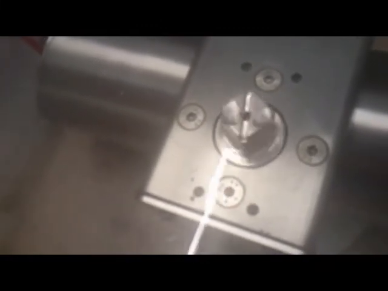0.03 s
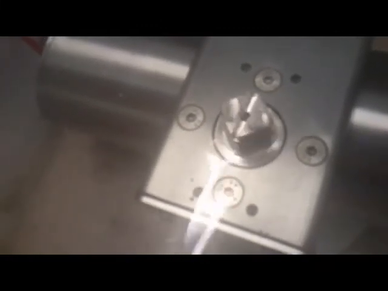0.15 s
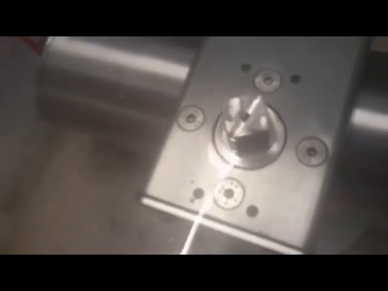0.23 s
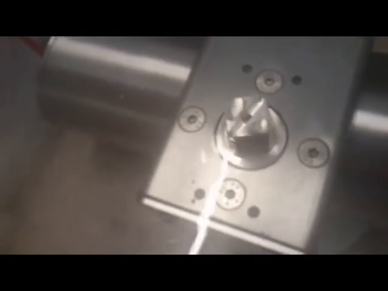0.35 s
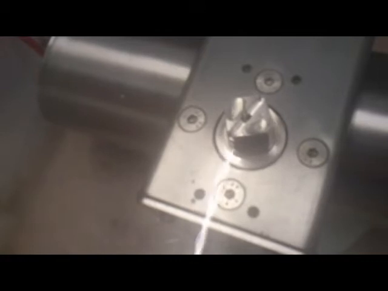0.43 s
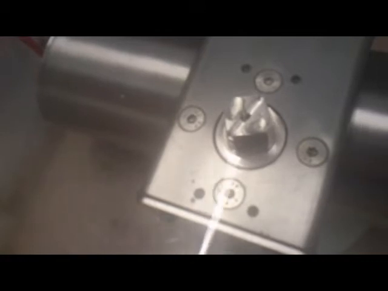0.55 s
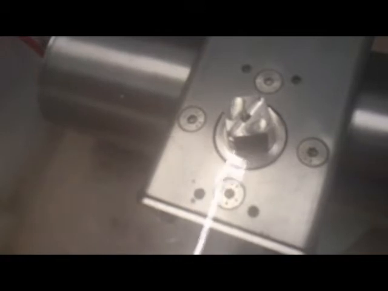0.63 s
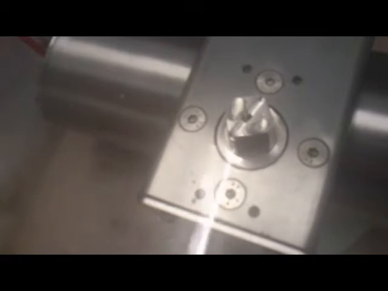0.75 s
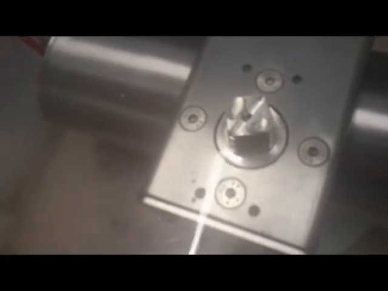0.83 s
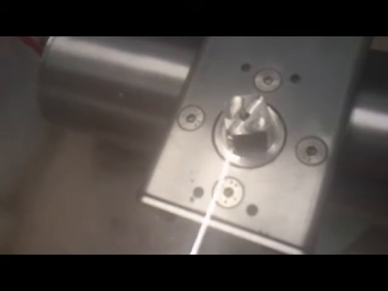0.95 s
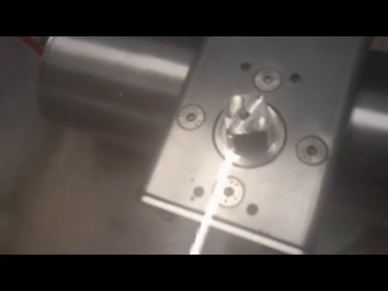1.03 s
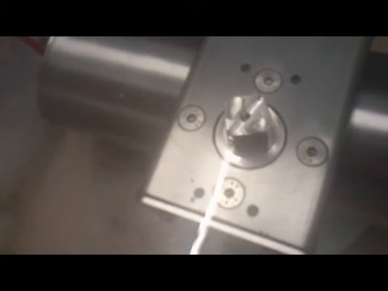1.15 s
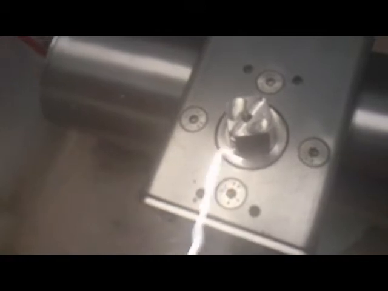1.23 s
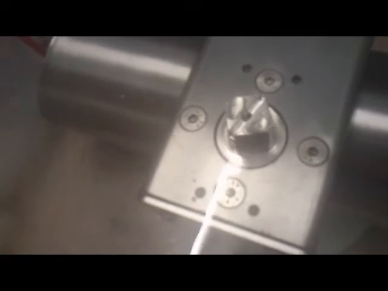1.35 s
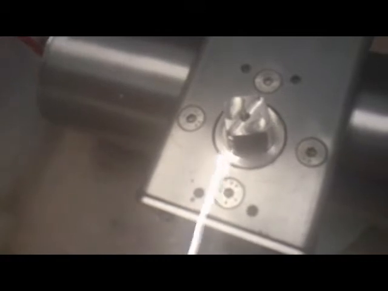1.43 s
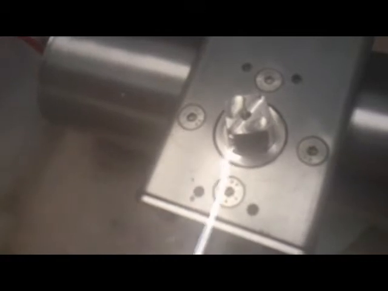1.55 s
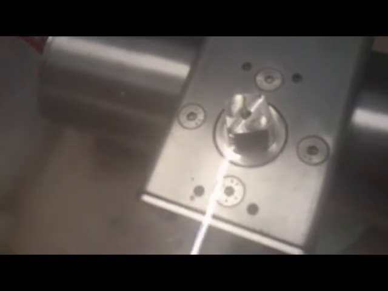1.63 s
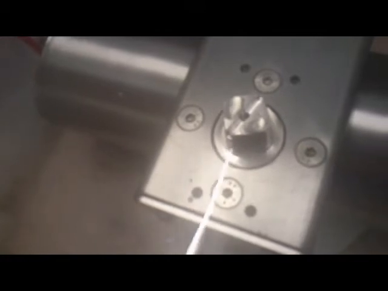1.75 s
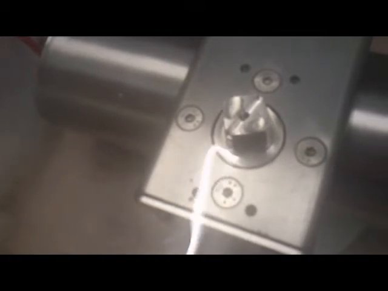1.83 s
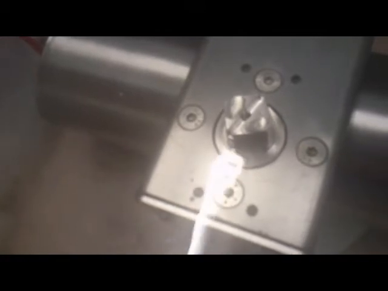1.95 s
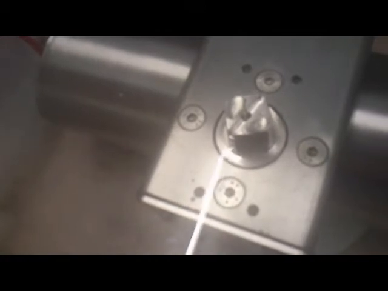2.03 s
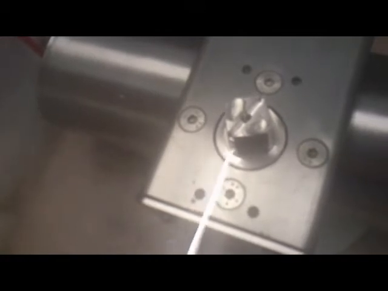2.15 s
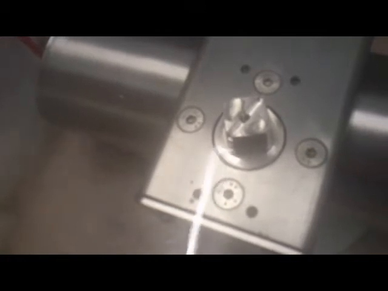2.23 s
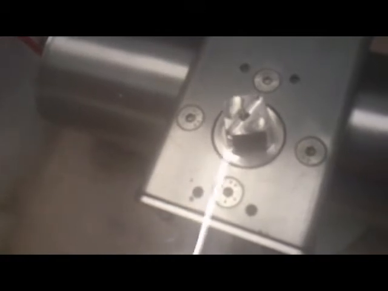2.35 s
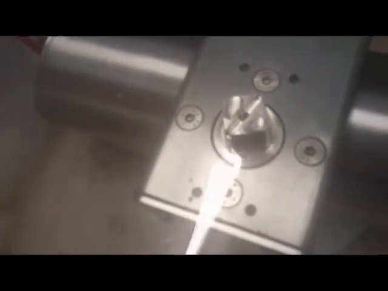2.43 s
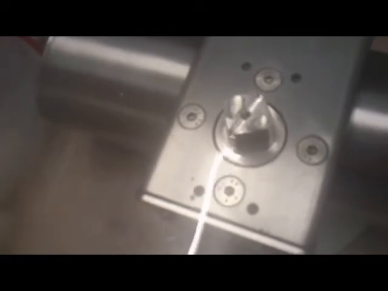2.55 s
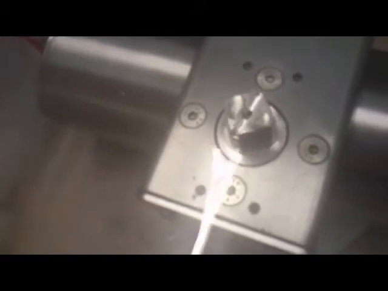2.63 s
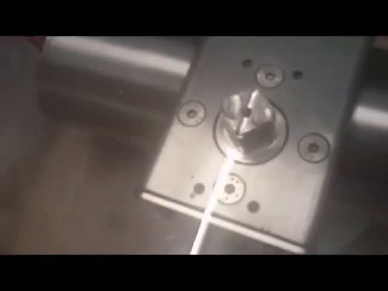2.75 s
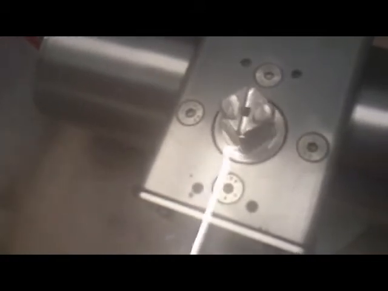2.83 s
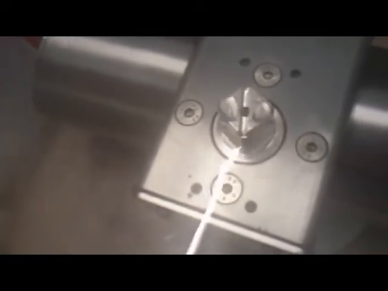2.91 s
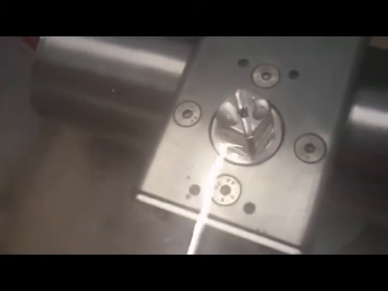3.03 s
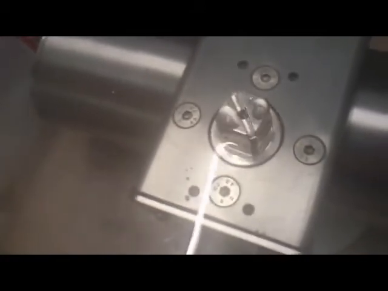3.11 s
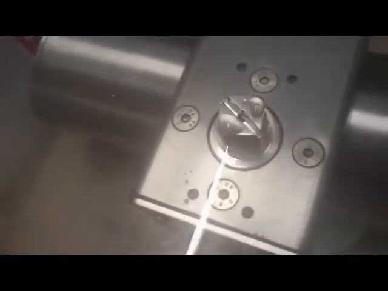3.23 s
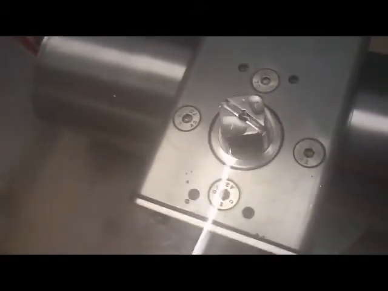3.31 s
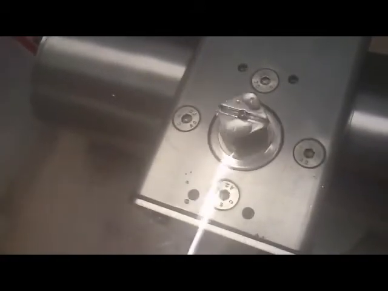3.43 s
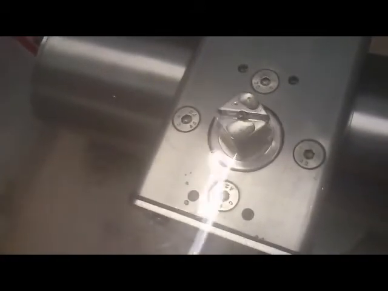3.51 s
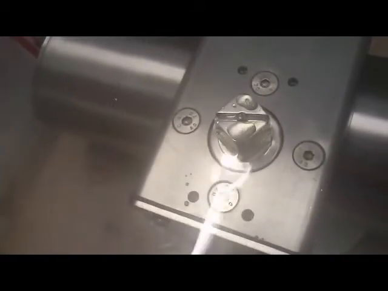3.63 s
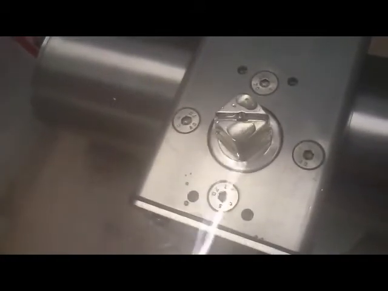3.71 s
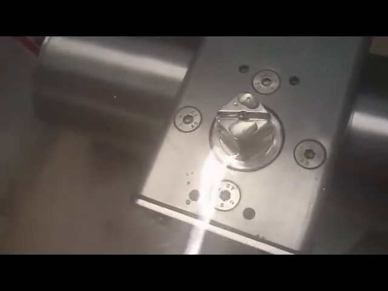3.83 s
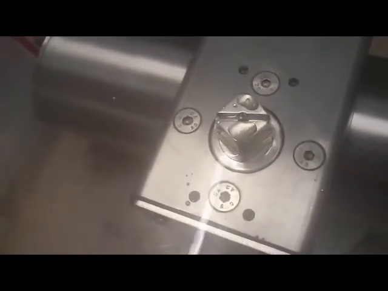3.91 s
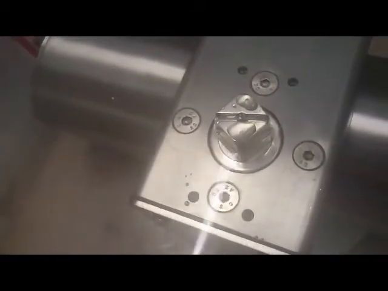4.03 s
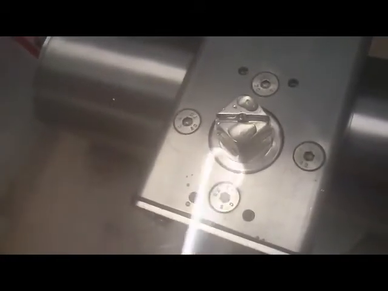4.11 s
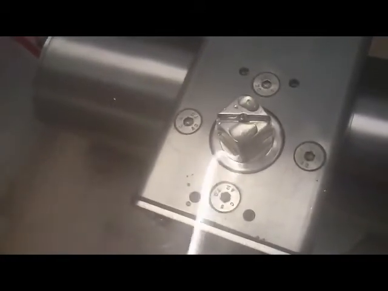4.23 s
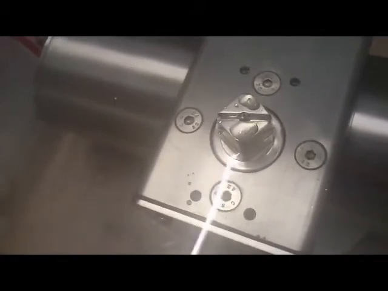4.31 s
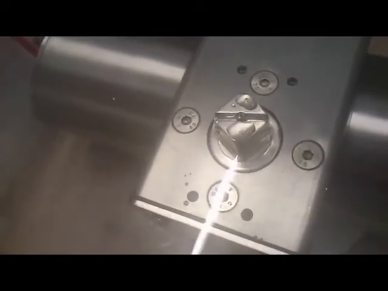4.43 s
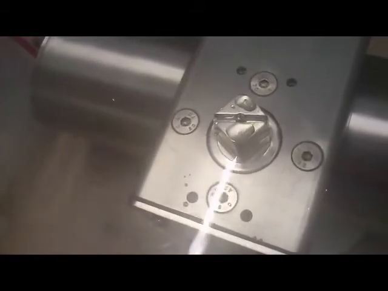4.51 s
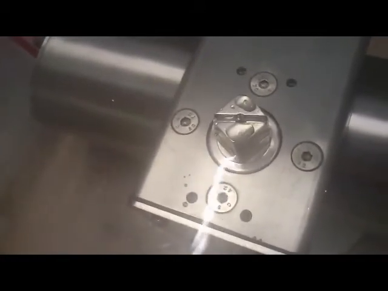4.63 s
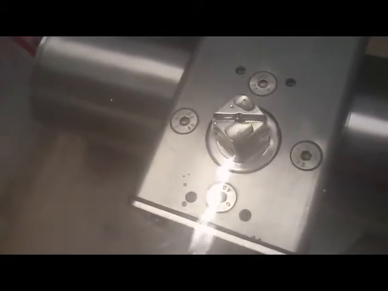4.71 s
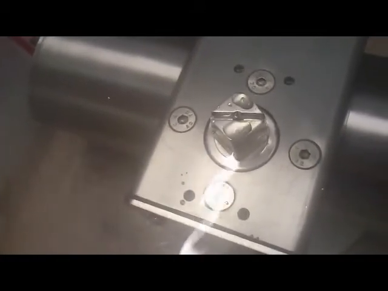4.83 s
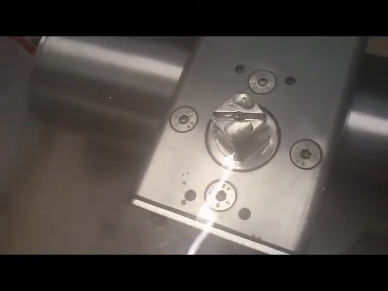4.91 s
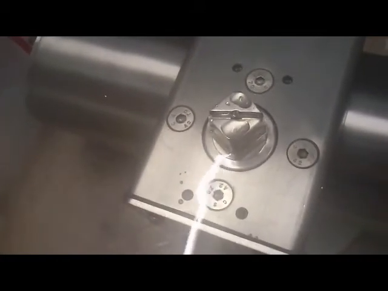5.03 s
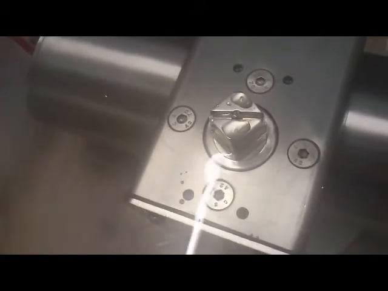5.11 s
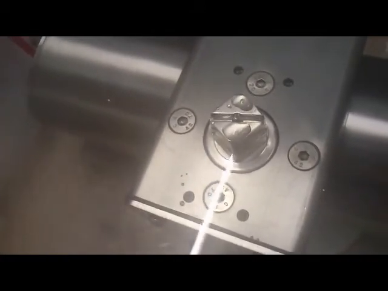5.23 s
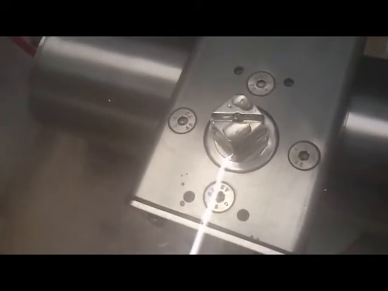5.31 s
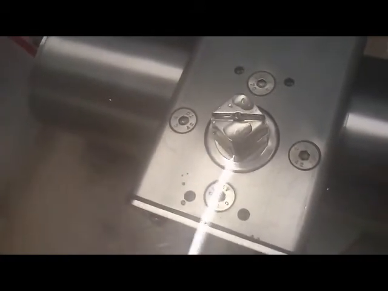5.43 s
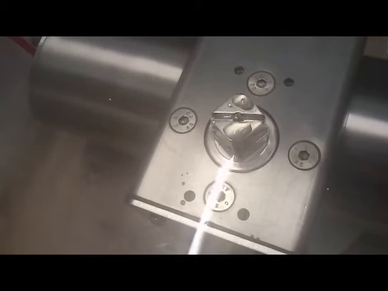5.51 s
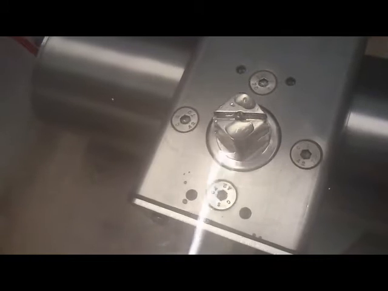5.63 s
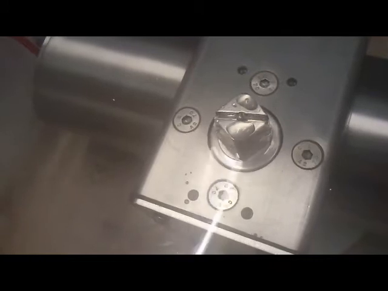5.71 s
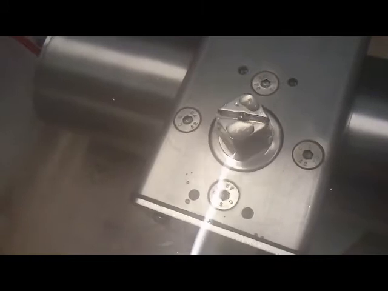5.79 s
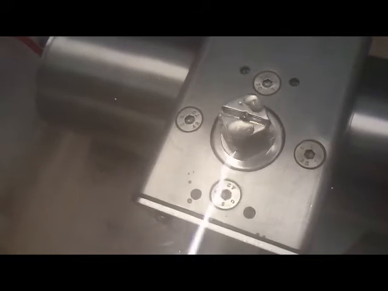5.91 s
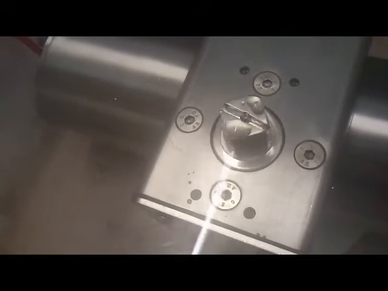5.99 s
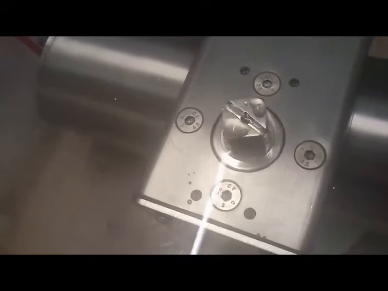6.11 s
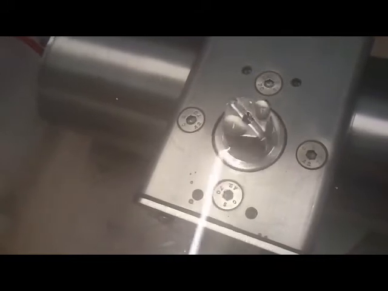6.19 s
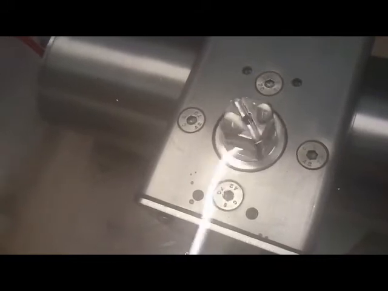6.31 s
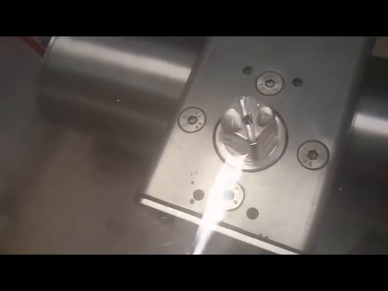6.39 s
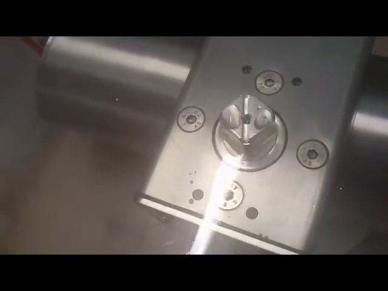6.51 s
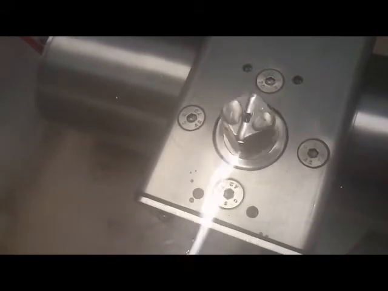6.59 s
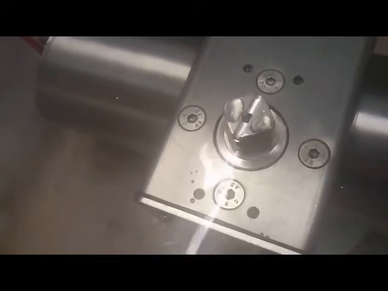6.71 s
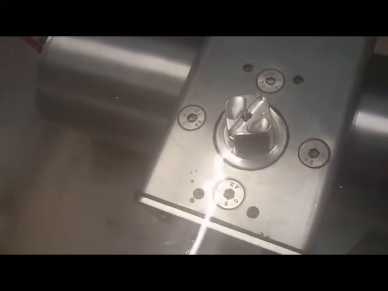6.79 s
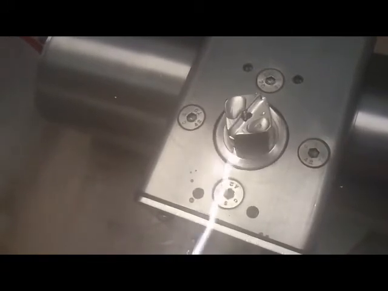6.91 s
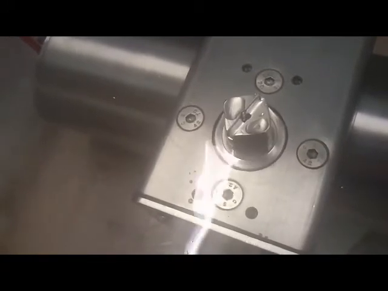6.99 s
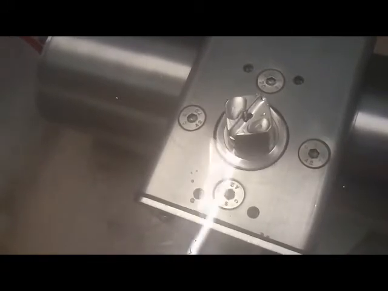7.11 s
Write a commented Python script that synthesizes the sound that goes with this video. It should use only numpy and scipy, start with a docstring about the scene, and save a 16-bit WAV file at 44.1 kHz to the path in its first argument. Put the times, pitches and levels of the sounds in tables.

```python
"""A small workshop: a pneumatic rotary actuator on a steel block is cycled three times, close by.
Jets of filtered noise roar from the exhaust port for about a second each; the first is already under way.
The later blasts come with a thud and a louder start. After closings the line bleeds down as hiss and a thin
whistle, the third cut short by the end. Forced bench modes knock softly over faint air noise and machine hum."""
import sys
import numpy as np
from scipy import signal
from scipy.fft import rfft, irfft
from scipy.io import wavfile

SR = 44100
rng = np.random.default_rng(int(sys.argv[2]) if len(sys.argv) > 2 else 0)


def master(y):
    """Save y as 16-bit WAV."""
    cut = np.clip(np.atleast_2d(y).T, -1, 1)
    pcm = np.round(cut * 32767)  # scale
    wavfile.write(sys.argv[1], SR, pcm.astype(np.int16))


N = 315315
TIME = np.arange(N) / SR
FREQ = np.maximum(np.fft.rfftfreq(N, 1 / SR), 1)


def from_db(db):
    """Decibels to gain."""
    return 10 ** (np.asarray(db) / 20)


def since(start_s):
    """Seconds gone by since a moment, zero before it."""
    return np.maximum(TIME - start_s, 0)


def at_level(x):
    """Scale stereo sound so that its left-right mean has rms 1."""
    return x / np.sqrt(np.mean(x.mean(axis=0) ** 2) + 1e-20)


def panned(x, right_db):
    """Lean a sound to the right by a level difference."""
    return x * from_db(np.array([[-right_db], [right_db]]) / 2)


def over_pitch(rows, hz=FREQ):
    """Interpolate each column of a spectrum on a log-frequency axis."""
    points, *columns = np.transpose(rows)
    return np.array([np.interp(np.log(hz), np.log(points), c) for c in columns])


def white():
    """Spectrum of two unrelated white noises."""
    return rfft(rng.standard_normal((2, N)))


def drift(rate_hz):
    """Slow random signal with spread 1."""
    slow = irfft(white()[0] / (1 + (FREQ / rate_hz) ** 2), N)
    return slow / slow.std()


def wavering_tone(hz, width_hz):
    """Narrow noisy line of rms 1: two carriers in quadrature with drifting strengths."""
    phase = 2 * np.pi * np.cumsum(hz * np.ones(N)) / SR
    return drift(width_hz) * np.cos(phase) + drift(width_hz) * np.sin(phase)


def coloured_noise(colour, ripple):
    """Spectrum of stereo noise with a broad colour and narrow peaks and dips."""
    shape_db = over_pitch(colour)
    for hz, width_hz, left_db, right_db in ripple:
        gain_db = np.array([[left_db], [right_db]])
        shape_db = shape_db + gain_db / (1 + (2 * (FREQ - hz) / width_hz) ** 2)
    return white() * from_db(shape_db)


# air noise, relative: freq_hz, density_db_per_hz
AIR_COLOUR = [(12, -29.5), (20, 2.5), (46, -7), (140, -15.5), (207, -14.5), (238, -15.5), (352, -13.5),
              (491, -19.5), (614, -18.5), (788, -24), (1130, -22), (1670, -26.5), (5690, -32.5),
              (7730, -41), (15500, -38)]
AIR_DB = -60.5
# air noise in stereo: freq_hz, left_right_likeness, right_lean_db
AIR_STEREO = [(50.16, 0.6, 4), (130, 0.8, 4), (289.3, 0.95, 2), (640, 0.22, 2), (2400, 0.05, 3),
              (4400, 0.0, -0.5)]
# machine hum lines: pitch_hz, level_db
HUM_LINES = [(269, -80), (350, -75.5), (598, -74), (641, -83.5), (1157, -83.5), (1281, -89), (1884, -87.5)]


def workshop():
    """Ventilation noise, alike on both sides in the bass, and a slightly wavering machine hum."""
    mid, side = white()
    alike, lean_db = over_pitch(AIR_STEREO)
    alike = np.clip(alike, 0, 1)
    both = np.sqrt(1 + alike) * mid + np.sqrt(1 - alike) * side * [[1], [-1]]
    both = both * from_db(lean_db / 2 * [[-1], [1]])
    air = from_db(AIR_DB) * at_level(irfft(both * from_db(over_pitch(AIR_COLOUR)), N))
    hum = 0
    for pitch_hz, level_db in HUM_LINES:
        steady = np.sin(2 * np.pi * pitch_hz * TIME)
        hum = hum + from_db(level_db) * (steady + 0.65 * wavering_tone(pitch_hz, width_hz=7.2))
    return air + panned(hum, right_db=6.5)


# valve strokes: opens_s, closes_s, rise_s, loud_start_db, whistle_db
VALVE_STROKES = [(-0.5, 0.526, 0.014, 5, -65.5), (2.704, 3.814, 0.018, 6.5, -69),
                 (5.8679, 7.12, 0.0089, 8, -70)]
# borders between rumble, roar, hiss, sizzle: freq_hz
EDDY_EDGES_HZ = [1000, 3500, 9000]
# jet colour, relative, per stroke: freq_hz, left_db, right_db
JET_COLOUR_1 = [(60, -32.5, -31), (250, -24, -34), (998, -20.5, -23), (1270, -19, -6), (2000, -15.5, -5.5),
                (3420, -6, -5), (4600, -5.5, -4), (6500, -4, -2), (8740, -11.5, -6.5), (10500, -15.5, -6),
                (12250, -7, 0.5), (14100, -5, -4.0), (15500, -8.5, -10)]
JET_COLOUR_2 = [(60, -27, -27.5), (250, -25, -17.5), (1009, -25, -22.5), (1264, -23, -11.5),
                (2000, -15.5, -5), (3400, -11.5, -2), (4600, -3.5, -2.5), (6450, -4.5, -2),
                (8800, -18.5, -5.5), (10500, -11.5, -2.5), (12300, -9.5, 0.5), (14000, -7.5, -6),
                (15500, -8, -6)]
JET_COLOUR_3 = [(60.5, -28, -30.5), (246, -24.5, -19.5), (980, -23, -23.5), (1350, -23, -8.5),
                (1980, -22.5, -7), (3320, -8.0, -9), (4580, -2.5, 2.5), (6700, -4.5, 0.5),
                (8760, -6.5, -6.5), (10500, -11, 0), (11960, -3.5, 2), (13900, -8.5, -2), (15400, -4, -22)]
# narrow peaks and dips in each blast's colour, per stroke: freq_hz, width_hz, left_db, right_db
JET_RIPPLE_1 = [(303.5, 50, 0.0, 8.5), (516.6, 110, -5, 6.5), (753, 50, 2, 1), (950, 50, 2, 8),
                (1444, 90, -3.5, -6.5), (1890, 110, -2, 4.5), (2033, 87, 7.5, 8.5), (2280, 260, 4, -2.5),
                (2652, 110, -9, 8.5), (3100, 230, 0.5, 6), (3400, 73, -8.5, -6.5), (4220, 16, -1.5, 14.5),
                (4610, 210, 5, 5), (4680, 33, -4, 11.5), (5000, 100, 2, 7.5), (5760, 100, -2, -2),
                (5780, 50, 3.5, 8), (6136, 50, -1.5, 3.5), (7084, 100, 1, 5.5), (7670, 260, 3, 4.5),
                (8900, 90, -11, -0.5), (10880, 50, -14.5, 2.5), (12900, 150, 1, 3), (14500, 90, -2.5, 8.5)]
JET_RIPPLE_2 = [(413, 150, -0.5, -8.5), (1040, 74, 2.5, 3.5), (1200, 50, 5, 3.5), (1309, 260, 2.5, 6),
                (1902, 37, -2, 5), (2340, 30, -1, 3), (2710, 230, 0, 5), (3340, 45, 4.5, -10),
                (3240, 71, -6, -8), (3800, 50, 5, 2.5), (4020, 160, -5, -7.5), (4580, 81, 0.5, 6.5),
                (4800, 90, -0.5, 9), (4980, 50, -4.5, -0.5), (5210, 38, -1, 12.5), (5450, 406, 0, 5),
                (6155, 26, -0.5, 7.5), (6640, 45.6, 1, 12), (7050, 150, -2, 4), (7980, 160, 1.5, 6.5),
                (8240, 150, 1.5, -2.5), (8600, 50, 10, 3), (8860, 83, 10, 2.5), (13178, 50, 2.5, 2.5)]
JET_RIPPLE_3 = [(305, 32, 3, 8.5), (576, 77, 5, 9.5), (768, 50, 0, 6), (950, 68, 2.5, 4),
                (1467, 77, -3, -11), (1610, 81, 8, 0.5), (1970, 210, 5, 4.5), (2150, 190, 4.5, -2),
                (2710, 45, 9, 5.5), (3010, 220, -5, 4), (3196, 96, 10.5, 8.5), (3320, 80, -15, -4),
                (3320, 50, -8, 3), (3835, 70, 7, 10.5), (4340, 330, 1.5, 1), (5020, 78, -8, -20),
                (5700, 280, 3, -5), (6158, 24, 3, 7.5), (6950, 44, 12.5, 1), (7630, 200, -6, 5.5),
                (8053, 81, -6, 7), (8360, 80, -2, 9), (9500, 50, 2.5, 6), (9800, 50, 2.0, 6)]
# jet level halfway through each stroke: rumble_db, roar_db, hiss_db, sizzle_db
JET_MIDWAY = [(-50.5, -27, -21, -21.5), (-50.5, -29.5, -21.5, -21), (-49, -27.5, -22.5, -20.5)]
# change as the chamber empties, per stroke:
# right_rumble_db_per_s, roar_db_per_s, hiss_db_per_s, sizzle_db_per_s
JET_CHANGE = [(3, 0, -0.087, -2), (-2.5, 4, 0.99, -3.5), (5, -3.5, -0.5, -1)]
LEFT_RUMBLE_DB_PER_S = -19
# unsteadiness of rumble, roar, hiss, sizzle: spread_db, rate_hz
JET_FLUTTER = [(2.5, 14), (1.25, 25), (0.46, 25), (0.47, 25)]
# spent air swelling the rumble: centre_s, half_length_s, swell_db
RUMBLE_GUST = (6.77, 0.1, 4.8)
LOUD_START_S = 0.029
PRESSURE_LASTS_S, SAG_DB_PER_S = 1.06, 27  # a valve held open longer runs short of air
SHUT_DB_PER_S = 193.5


def exhaust(stroke, levels_db, trends_db_per_s, colour, ripple):
    """Turbulent air through the port: a louder start, a blast, a quick fall as the valve closes."""
    opens_s, closes_s, rise_s, loud_start_db, _ = stroke
    turbulence = coloured_noise(colour, ripple)
    past_halfway_s = np.clip(TIME, opens_s, closes_s) - (opens_s + closes_s) / 2
    gust_s, gust_half_s, gust_db = RUMBLE_GUST
    gust = gust_db * np.exp(-((TIME - gust_s) / gust_half_s) ** 2)
    rumble_trend = np.array([[LEFT_RUMBLE_DB_PER_S], [trends_db_per_s[0]]])
    changes_db = [rumble_trend * past_halfway_s + gust]
    changes_db += [trend * past_halfway_s for trend in trends_db_per_s[1:]]
    zone = np.searchsorted(EDDY_EDGES_HZ, FREQ)
    jet = 0
    for k, (level_db, change_db, flutter) in enumerate(zip(levels_db, changes_db, JET_FLUTTER)):
        spread_db, rate_hz = flutter
        eddies = at_level(irfft(turbulence * (zone == k), N))
        jet = jet + eddies * from_db(level_db + change_db + spread_db * drift(rate_hz))
    opening = np.minimum(since(opens_s) / rise_s, 1) ** 2
    # each blast starts louder, then settles within about 30 ms
    loud_start = loud_start_db * np.exp(-(since(opens_s + rise_s) / LOUD_START_S) ** 1.9)
    sag = SAG_DB_PER_S * since(opens_s + PRESSURE_LASTS_S)
    return jet * opening * from_db(loud_start - sag - SHUT_DB_PER_S * since(closes_s))


# bleed hiss, relative: freq_hz, left_db_per_hz, right_db_per_hz
HISS_COLOUR = [(652, -16, -13), (1000, -2.5, -1), (1500, -8, -11), (2993, -0.5, -1), (4500, -2.5, -3),
               (5960, -1, -4.5), (7600, -1, -0.5), (8750, -6, -6), (11800, -5, -0.5), (13500, -6, -7),
               (15600, -4.5, -7.5)]
# cavities sounded by seeping air: freq_hz, width_hz, left_db, right_db
BLEED_CAVITIES = [(952, 130, 11, 10), (1365, 70, -3, 15.5), (2260, 45, 2, 3.5), (2660, 50, -2, 3),
                  (4430, 90, 9, 13.5), (13020, 80, -0.5, 7)]
BLEED_DB, BLEED_RISE_S, BLEED_DB_PER_S = -52.5, 0.1, 20
SEAL_SEATS_S, SEATED_DB_PER_S = 0.82, 35  # extra fade once the seal seats
WHISTLE_HZ, WHISTLE_FLAT_HZ, WHISTLE_SETTLE_S, WHISTLE_DB_PER_S = 1914, 90, 0.2, 16


def bleed(stroke):
    """The last air seeps past a seal, hissing and whistling; the whistle starts flat and settles."""
    _, closes_s, _, _, whistle_db = stroke
    age_s = since(closes_s)
    hiss = at_level(irfft(coloured_noise(HISS_COLOUR, BLEED_CAVITIES), N))
    hiss = from_db(BLEED_DB - BLEED_DB_PER_S * age_s) * hiss
    whistle_hz = WHISTLE_HZ - WHISTLE_FLAT_HZ * np.exp(-age_s / WHISTLE_SETTLE_S)
    whistle_gain = from_db(whistle_db - WHISTLE_DB_PER_S * age_s)
    whistle = whistle_gain * wavering_tone(whistle_hz, width_hz=46)
    rise = np.minimum(age_s / BLEED_RISE_S, 1)
    seeping = rise * from_db(-SEATED_DB_PER_S * since(closes_s + SEAL_SEATS_S))
    return (hiss + panned(whistle, right_db=19.5)) * seeping


# thuds and knocks of the mechanism: start_s, level_db, contact_ms
MECHANISM_KNOCKS = [(0.533, -60, 1.2), (0.766, -47.5, 3.5), (1.096, -42, 0.9), (1.123, -46, 4),
                    (1.165, -51, 3.5), (1.307, -38.5, 0.53), (2.707, -34.5, 3.9), (2.854, -33.5, 12),
                    (3.812, -40.5, 2.4), (4.366, -53.5, 2.6), (5.869, -22.5, 4.2), (6.734, -33.5, 2.2),
                    (7.105, -46, 1.6)]
# modes of the block on its bench: pitch_hz, level_db, t60_s
BENCH_MODES = [(62, -17.5, 0.08), (109, -8.5, 0.21), (133, -14, 0.18), (185.2, -8, 0.1), (225, -5.5, 0.12),
               (284, -12, 0.09), (440, -11.5, 0.044), (516, -5.5, 0.059), (575, -2.5, 0.055),
               (726, -10, 0.044), (899, -9.5, 0.04), (1290, -9, 0.035), (1617, -17, 0.03),
               (2050, -19, 0.025)]


def knocks():
    """Soft pushes ring the bench; a longer contact gives a duller thud."""
    force = np.zeros(N)
    for start_s, level_db, contact_ms in MECHANISM_KNOCKS:
        progress = np.clip((TIME - start_s) * 1000 / contact_ms, 0, 1)
        push = np.sin(np.pi * progress) ** 2
        force -= from_db(level_db) * push / push.sum()
    t = TIME[:SR // 2]
    ring = 0
    for pitch_hz, level_db, t60_s in BENCH_MODES:
        ring = ring + from_db(level_db - 60 * t / t60_s) * np.sin(2 * np.pi * pitch_hz * t)
    return panned(signal.fftconvolve(force, ring)[:N], right_db=3.5)


# reverberation time: freq_hz, t60_s
ROOM_DECAY = [(200, 0.28), (2000, 0.32), (5000, 0.5), (9000, 0.22), (15000, 0.26)]


def room(x, wet_db):
    """Add a diffuse tail of decaying noise bands, each with its own reverberation time."""
    t = TIME[:SR // 2]
    edges_hz = np.geomspace(60, 16000, 9)
    tail = 0
    for low, high in zip(edges_hz, edges_hz[1:]):
        band_pass = signal.butter(2, [low, high], "band", fs=SR, output="sos")
        band = signal.sosfilt(band_pass, rng.standard_normal((2, len(t))))
        t60_s = over_pitch(ROOM_DECAY, np.sqrt(low * high))[0]
        decay = from_db(-60 * t / t60_s) * (t > .003)  # tail starts after 3 ms
        tail = tail + band * decay / np.linalg.norm(decay)
    wet = from_db(wet_db)
    reverb = signal.fftconvolve(x, tail, axes=1)[:, :N]
    return (x + wet * reverb) / np.sqrt(1 + wet ** 2)


def scene():
    """Blasts and knocks in the room, plus bleeds and workshop background."""
    colours = (JET_COLOUR_1, JET_COLOUR_2, JET_COLOUR_3)
    ripples = (JET_RIPPLE_1, JET_RIPPLE_2, JET_RIPPLE_3)
    blasts = sum(map(exhaust, VALVE_STROKES, JET_MIDWAY, JET_CHANGE, colours, ripples))
    bleeds = sum(map(bleed, VALVE_STROKES))
    return room(blasts, wet_db=-7.0) + room(knocks(), wet_db=-7.5) + bleeds + workshop()


CUTOFF_HZ = 15750


def record(dry):
    """Clip peaks at full scale, then cut the top steeply."""
    low_pass = signal.firwin(601, CUTOFF_HZ, fs=SR)
    return signal.fftconvolve(np.clip(dry, -1, 1), low_pass[None], mode="same", axes=1)


dry = scene()
out = record(dry)
master(out)
```